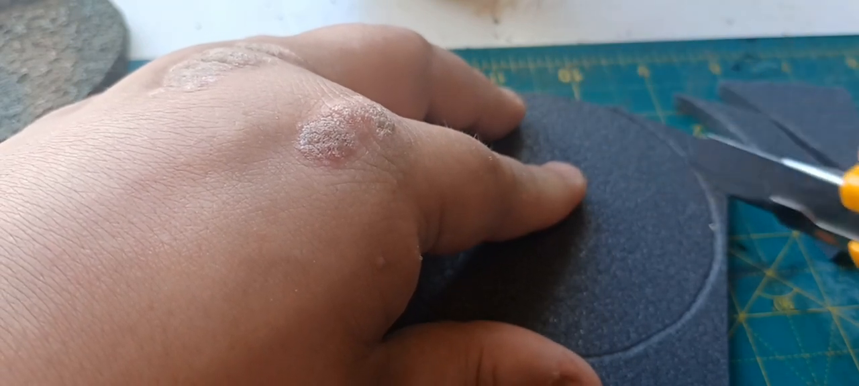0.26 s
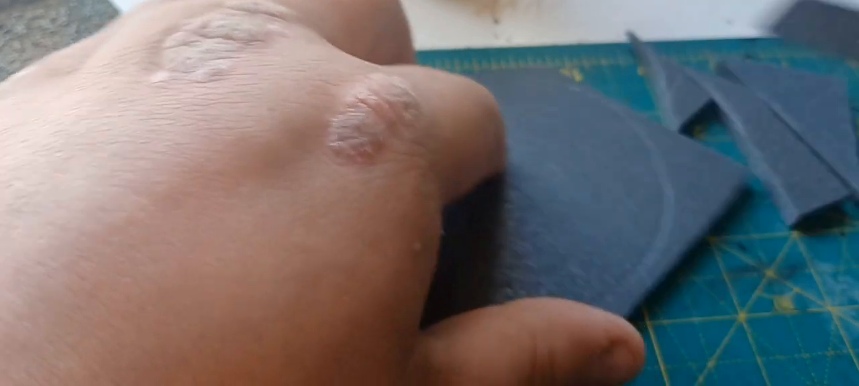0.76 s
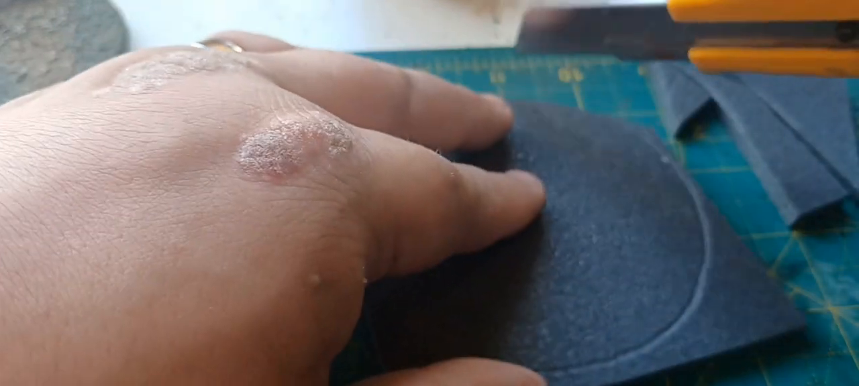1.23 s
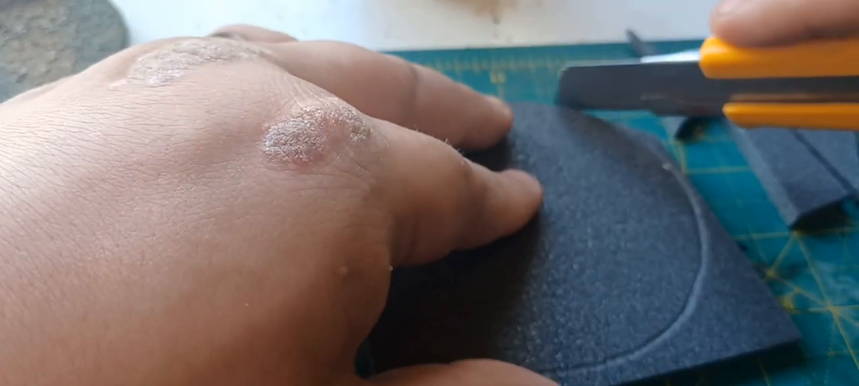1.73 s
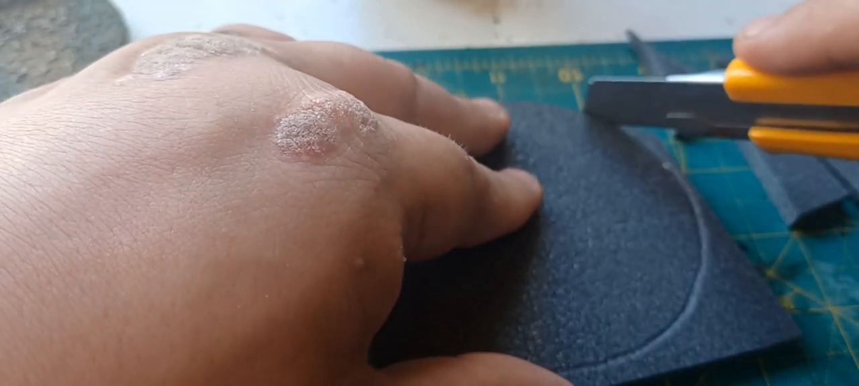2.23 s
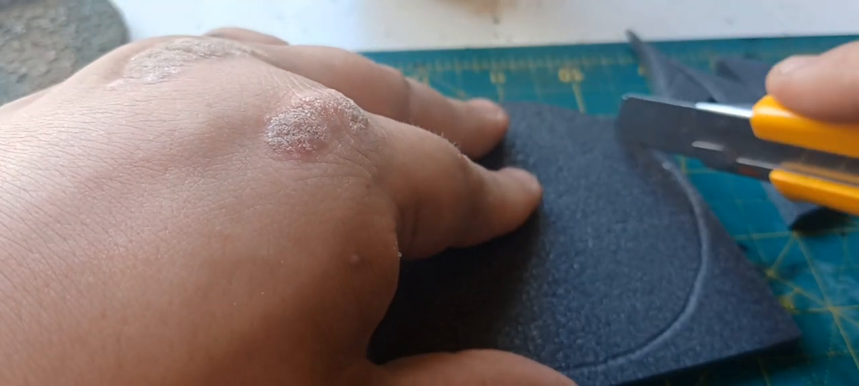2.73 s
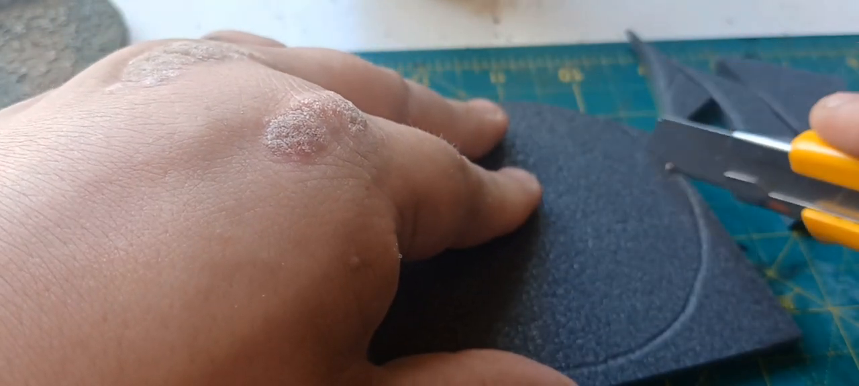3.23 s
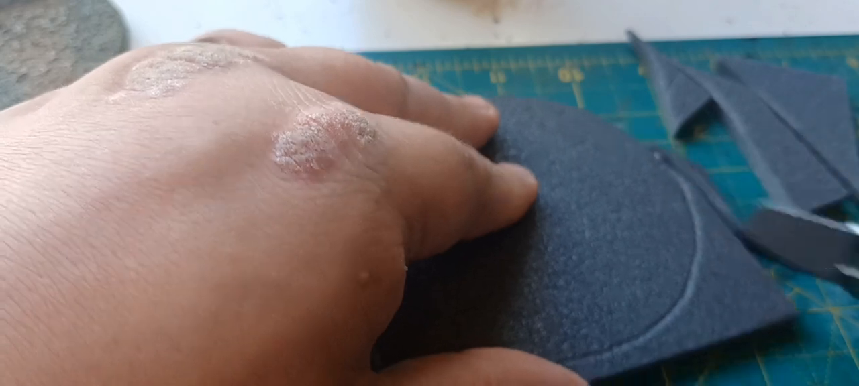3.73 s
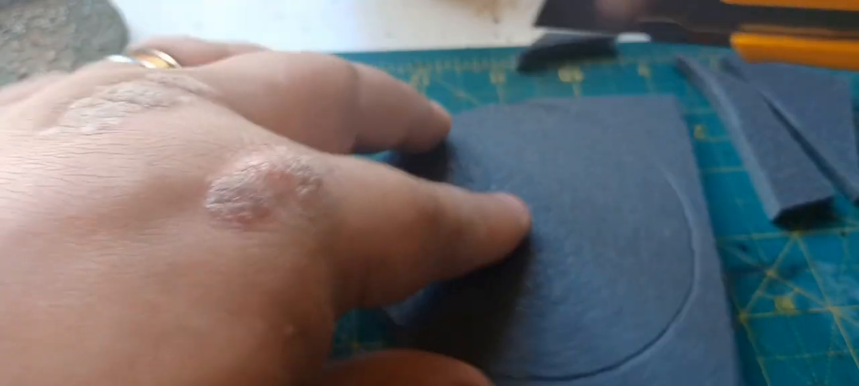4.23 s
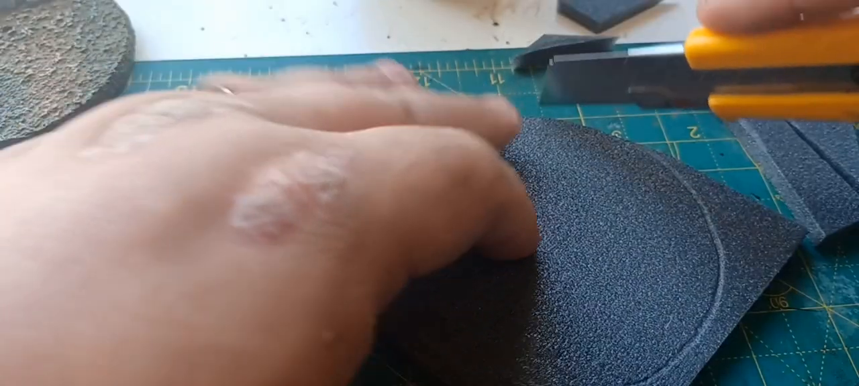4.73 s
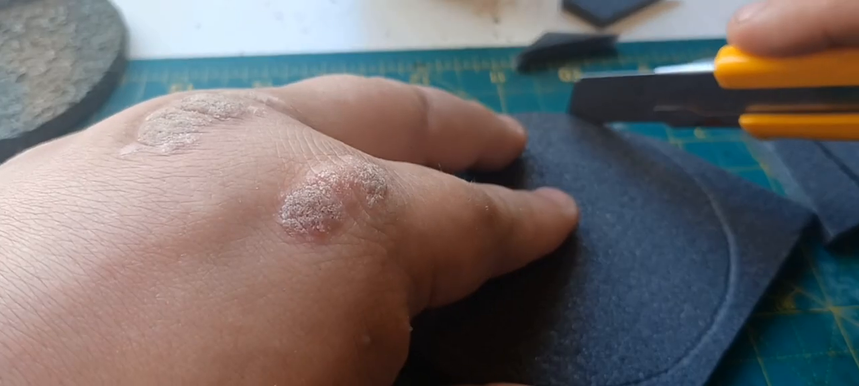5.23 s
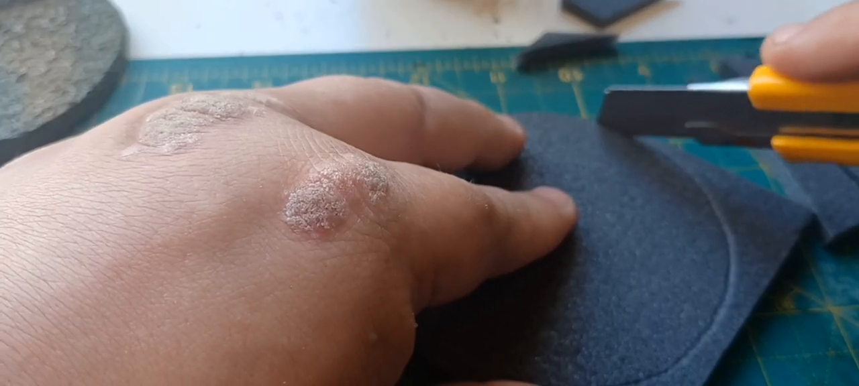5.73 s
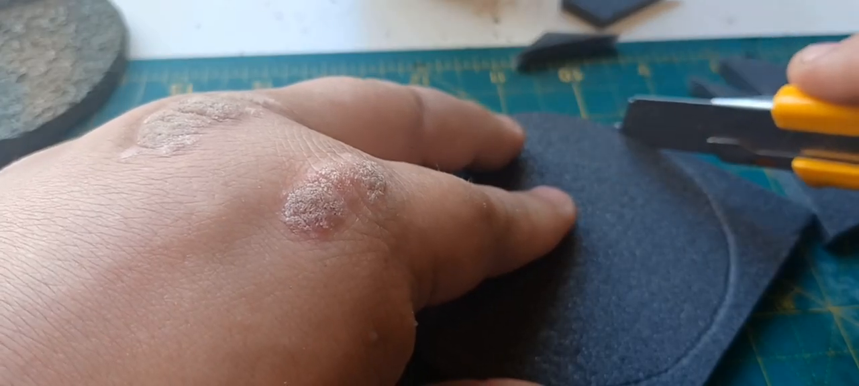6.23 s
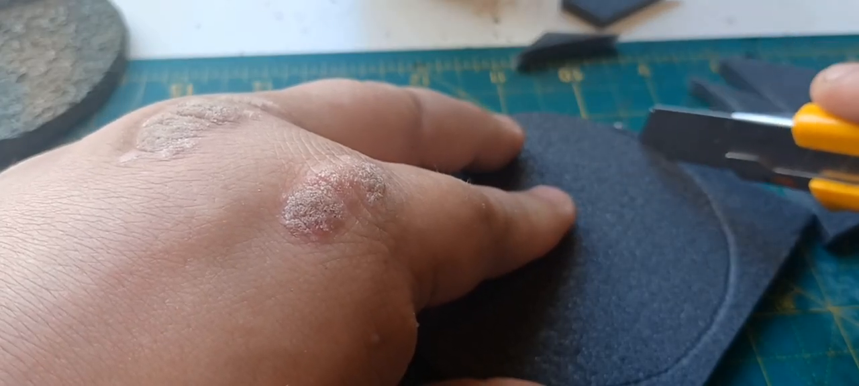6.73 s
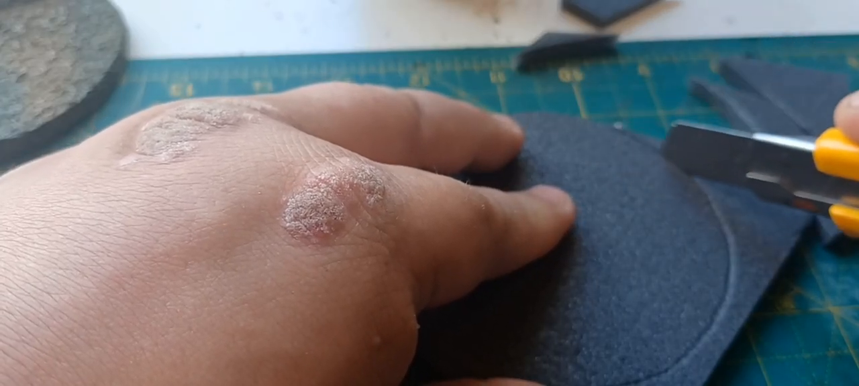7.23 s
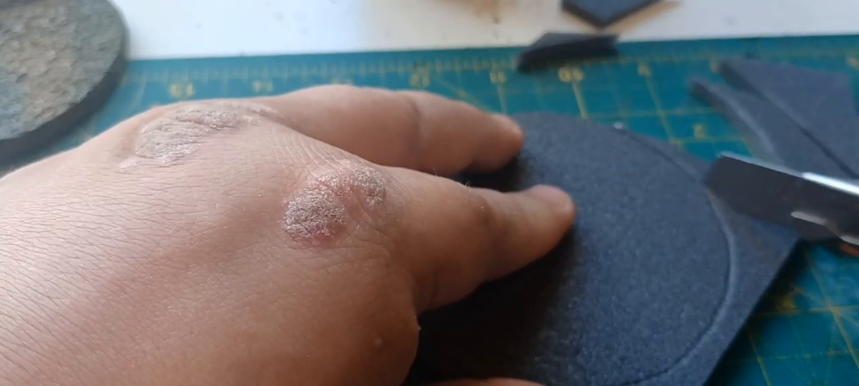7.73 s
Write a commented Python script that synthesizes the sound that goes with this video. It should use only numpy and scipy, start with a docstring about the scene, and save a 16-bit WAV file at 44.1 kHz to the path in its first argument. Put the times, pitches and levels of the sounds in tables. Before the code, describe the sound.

A utility knife cuts foam on a mat, close to a phone microphone in a quiet room. From about 0.3 to 1.3 seconds come bright, stuttering, raspy strokes, with soft hand bumps on the table near 0.5. Distant knocks and heavy thumps sound around 1 and 1.6 seconds. The blade then creeps faintly, with tiny ticks, soft hollow rustles and far knocks near 2.4 and 3.2. The loudest cutting runs from 3.5 to about 4.9 seconds, several quick scratchy strokes with small snaps and a firm, dull table bump at 3.7. A lull follows with faint scraping and scattered ticks. Thumps and knocks from elsewhere in the house return at 6.2 and cluster between 6.7 and 7.1, with two small metallic pings around 7. The scratch swells again from 7.7 to the end. A faint low table hum comes and goes underneath.

```python
"""A dense, bright scratch swells close by: a thin blade is drawn through foam on a cutting mat.
The foam cells tear one by one while stick-slip friction makes the blade rasp and the sheet flex.
The table hums and bumps under the hands; cells and fingers tick, and a hollow rustle comes and goes.
Knocks, heavy thumps and small pings arrive from elsewhere in the house, blurred by the rooms.
A two-port phone microphone picks it all up over the quiet air of the room."""
import sys
import numpy as np
from scipy import signal
from scipy.fft import rfft, irfft, next_fast_len
from scipy.io import wavfile
from scipy.ndimage import uniform_filter1d, map_coordinates

SR = 44100
rng = np.random.default_rng(int(sys.argv[2]) if len(sys.argv) > 2 else 0)


def unload_wav(signal):
    """Save mono or channel-first audio to the path in sys.argv[1] as 16-bit WAV at rate SR, clipped to [-1, 1]."""
    wavfile.write(
        sys.argv[1],
        SR,
        np.round(np.clip(np.atleast_2d(signal).T, -1, 1) * 32767).astype(np.int16),
    )


N = 351477
FFT_SIZE, ENVELOPE_STEP = next_fast_len(N), 16  # samples

# Blade strokes: peak_s, scratch_db, rasp_db, rise_20db_s, fall_20db_s, peak_to_lift_s
STROKES = [(0.565, -40, -41, 0.1, 2.3, 0.15), (0.731, -36, -37, 0.18, 0.2, 0.095),
           (0.932, -43, -48, .005, .06, 0.022), (1.06, -39, -42, .12, 0.16, 0.22),
           (1.235, -47, -48, 0.18, 0.45, 0.3), (2.37, -55, -52, 0.3, .3, .1),
           (3.65, -32, -36, 0.22, 0.16, 0.11), (3.835, -31, -34.5, .1, 1, 0.055),
           (3.89, -35, -39, .08, .06, .1), (4.139, -37, -41, 0.006, 0.5, .09),
           (4.19, -38, -40, 0.05, 0.03, 0.04), (4.258, -30, -34, 0.03, .2, .175),
           (4.31, -37, -40, .05, .07, .1), (4.532, -39, -42, .005, 0.8, 0.035),
           (4.61, -45, -46, .05, 0.06, .06), (4.751, -50, -52, .005, 0.3, 0.09),
           (4.856, -50, -47, .005, .05, .035), (6.467, -59.5, -62.5, 0.17, 0.1, .15),
           (7.025, -62, -55, 0.28, 0.4, 0.11), (7.745, -50, -56.5, 0.07, .5, .2),
           (7.95, -42, -50, 0.3, .5, .2)]
# The blade creeping on slowly: time_s, scratch_db, rasp_db
CREEP = [(0, -54, -55.5), (.35, -35.5, -36.5), (.4, -36.5, -38.5), (.445, -63, -58.5), (.88, -62.5, -49),
         (1.45, -58, -51.5), (1.75, -82, -83), (2.5, -77, -74), (2.65, -56, -56.5), (2.952, -56, -52.5),
         (3.45, -77, -65.5), (4.05, -55, -44.5), (4.46, -64, -64.5), (4.72, -62.5, -58), (5.0, -75, -75),
         (5.13, -72.5, -66), (5.28, -70, -86), (5.75, -68, -66.5), (6.0, -76, -86), (6.64, -74, -79),
         (6.73, -73, -51.5), (6.82, -73, -74), (7.18, -62, -61.5), (7.4, -69, -55), (7.97, -42, -43)]
# Spectrum of the bright foam scratch, with the microphone's notch near 7.7 kHz: frequency_hz, density_db
SCRATCH_SPECTRUM = [(4500, -13), (7000, -2), (7750, -13.5), (8800, -5), (12000, 4), (14000, 1.5),
                    (16000, 1)]
# Blade resonances: pitch_hz, width_hz, stroke_db, creep_db
BLADE_MODES = [(2660, 820, -13, -12), (3586, 630, -1, -3), (4507, 940, -6.5, -2), (5294, 710, -2.5, -3),
               (5850, 400, -7, -4), (6570, 410, -8.5, -10)]
# Spectrum of the flexing sheet: frequency_hz, density_db
SHEET_SPECTRUM = [(300, -6.5), (550, -3), (1050, 1.5), (1400, 2), (2000, -1), (2500, -1), (3200, -11.5)]
# Table top resonances: pitch_hz, width_hz, level_db
TABLE_MODES = [(135.5, 43, -4), (244.7, 51, 3), (311, 66, -2), (417.5, 101, -6), (565, 264, -15.5)]
# Hum of the table under the moving hands: time_s, level_db
TABLE_HUM = [(0.0, -54.5), (0.55, -43.5), (0.93, -55.5), (1.2, -45), (1.6, -59), (1.75, -49), (2.02, -58),
             (3.55, -57.5), (3.7, -51), (4.77, -57), (4.9, -77.5), (6.15, -62), (6.35, -62.5),
             (6.77, -50.5), (7.01, -49.5), (7.26, -56), (7.97, -50)]
# Hollow rustles: peak_s, level_db, rise_20db_s, fall_20db_s, peak_to_stop_s
RUSTLES = [(1.33, -46, 0.45, 0.3, 0.16), (2.37, -54, 0.22, .05, 0.013), (2.736, -57, 0.2, 0.4, 0.32),
           (4.55, -51, 0.3, 0.25, 0.11)]
# Resonance of the rustle: pitch_hz, width_hz, level_db
RUSTLE_MODES = [(1237, 300, 0)]
# Ticks of single cells and fingers: start_s, level_db
TICKS = [(0.9288, -31), (1.2426, -32), (1.504, -37), (2.168, -42), (2.1909, -44), (2.3471, -40),
         (2.587, -45), (2.602, -44), (2.616, -42), (2.6599, -38), (2.8898, -41), (2.9612, -36),
         (3.1857, -32), (3.3258, -43), (4.0078, -39), (4.0198, -34), (4.139, -27), (4.327, -27),
         (4.4268, -36), (4.7501, -42), (4.7785, -33), (4.8549, -32), (4.9152, -38), (4.936, -43),
         (5.1292, -44), (5.3053, -47), (5.4051, -43), (6.0147, -47), (6.0965, -50), (6.1774, -39),
         (6.3704, -50), (6.4622, -45), (6.476, -47), (6.6573, -48), (7.1611, -39), (7.7413, -29)]
# Foam breaking or the knife clicking: start_s, level_db
SNAPS = [(1.504, -41), (4.878, -36), (4.888, -38), (3.683, -33), (3.739, -34), (3.746, -35), (6.956, -37)]
# Soft bumps of the hand on the table: start_s, level_db, pitch_hz
BUMPS = [(0.429, -30.5, 298), (0.499, -23.5, 241), (0.572, -35, 226), (3.681, -18, 267), (3.723, -21, 253),
         (3.733, -12.5, 250.5), (4.268, -28.5, 328), (4.699, -29.5, 104), (4.763, -27, 241)]
# Far knocks on something hard: start_s, level_db, t60_s, wood_ring_db, thin_ring_db
KNOCKS = [(1.042, -38.5, 0.18, -5, -20), (1.589, -39.5, 0.42, 0.5, -16), (1.822, -55, 0.25, 5.5, -29),
          (2.377, -40, 0.27, 2, -7.5), (3.176, -37, 0.26, -2, -10), (3.679, -43, 0.13, -0.5, -3.5),
          (3.736, -43, 0.37, -7.5, -11), (4.854, -44, 0.11, -7.5, -15), (5.062, -44.5, 0.27, -7.5, -4),
          (6.2, -50.5, 0.41, 1.5, -21), (6.718, -46, 0.25, -14, -3), (6.821, -50, 0.45, 4, -29),
          (6.923, -43.5, 1, -9, -22), (7.042, -42.5, 0.23, -3, 1.5), (7.691, -59, 0.2, 2, 8.5)]
# Wooden and thin resonances of a knock: pitch_hz, width_hz, level_db
WOOD_MODES = [(891, 120, 6), (1100, 57, 9), (1335, 18, -1), (1790, 40, 2.5), (2335, 54, -1.5)]
THIN_MODES = [(1687, 20, 3), (2377, 60, -10)]
# Spectra of a knock's broad body and bright edge: frequency_hz, density_db
BODY_SPECTRUM = [(550, -15.5), (800, -5.5), (1180, 2.5), (2200, -7.5), (3100, -12.5), (4000, -39)]
EDGE_SPECTRUM = [(2500, -30), (3300, 1), (5000, 0.5), (6800, -12.5), (7800, -28)]
# Far thumps through the floor: start_s, level_db, t60_s, deep_share_db
THUMPS = [(1.05, -33, 0.25, -11), (1.189, -43, 1, -14.5), (1.33, -47, 0.4, 7), (1.587, -27.5, 0.77, -9.5),
          (2.4, -46.5, 0.38, -10), (6.202, -33.5, 0.48, -2), (6.826, -35.5, 0.39, -10),
          (6.929, -30, 0.39, -38), (7.051, -34.5, 0.5, -26)]
# Booming and deep resonances of the floor: pitch_hz, width_hz, level_db
FLOOR_MODES = [(125.8, 26.3, 5.5), (191.6, 16.5, 4), (252, 65, -4.5), (310, 67, -12), (465, 340, -23)]
DEEP_MODES = [(59.6, 58, -28), (83.9, 14.6, 18)]
# Far metallic pings: start_s, level_db, pitch_hz
PINGS = [(6.9566, -35, 4250), (6.9566, -43, 3550), (7.0795, -43, 5200)]
# Spectrum of the room's air: frequency_hz, density_db
ROOM_SPECTRUM = [(18, -51.5), (30, -24.5), (245, 2), (740, -45), (1200, -24.5), (1960, -35), (2480, -17),
                 (3310, -33.5), (3870, -25.5), (8520, -37), (12600, -35), (16000, -42)]


def cutting():
    """Stick-slip friction: the blade grips and slips, so scratch and rasp stutter together."""
    t = np.arange(N) / SR
    creep_s, creep_scratch_db, creep_rasp_db = np.transpose(CREEP)
    _, scratch_db, rasp_db, *_ = np.transpose(STROKES)
    strokes = np.array([swell(s, 0, rise, fall, lift) for s, _, _, rise, fall, lift in STROKES])
    hard, creep = undb(rasp_db) @ strokes, undb(np.interp(t, creep_s, creep_rasp_db))
    scratch_gain = undb(scratch_db) @ strokes + undb(np.interp(t, creep_s, creep_scratch_db))
    slip_db = .7 * walk(45) + 1.4 * walk(200)
    return foam_scratch(scratch_gain, slip_db) + blade_rasp(hard, creep, slip_db) + sheet(hard, creep)


def foam_scratch(gain, slip_db):
    """Countless tiny fractures merge into noise whose dull and bright bands waver independently."""
    cells = shape(pair(0.04, tearing(scatter_db=3.2)), SCRATCH_SPECTRUM)
    dull = butterworth(cells, 11500, "low")
    scratch = dull * undb(0.58 * walk(5.2)) + (cells - dull) * undb(2 * walk(4.47))
    return scratch * gain * undb(slip_db + np.array([[-.6], [.6]]))


def blade_rasp(hard, creep, slip_db):
    """Tearing excites the blade's resonances; each wavers and slides as the cut moves along the edge."""
    cells = pair(0.25, tearing(scatter_db=2.5))
    rasp = 0
    for hz, width, hard_db, creep_db in BLADE_MODES:
        waver = undb(2 * walk(4) + 1.8 * walk(40) - 34)
        drive = hard * undb(hard_db) + creep * undb(creep_db)
        mode = drift(ring(cells, [(hz, width, 0)]), share=.025, rate_hz=5)
        rasp += waver * drive * np.sqrt(width) * mode
    return rasp * undb(0.8 * slip_db + np.array([[-.7], [.7]]))


def sheet(hard, creep):
    """The flexing sheet radiates mid-range noise, mostly under hard strokes."""
    flex = pair(.5, tearing(scatter_db=2.4)) * undb(1.6 * walk(12))
    return shape(flex, SHEET_SPECTRUM) * undb(-4) * (hard + 0.5 * creep) ** 1.08


def table_hum():
    """Forced vibration: the moving hands drive the low modes of the table top."""
    level_db = np.interp(np.arange(N) / SR, *np.transpose(TABLE_HUM))
    return ring(pair(0.89, hiss), TABLE_MODES) * undb(level_db + 3.26 * walk(20))


def rustle():
    """Noise through one resonance gives a hollow rustle in short swells."""
    envelope = uniform_filter1d(sum(swell(*row) for row in RUSTLES), 900)
    return envelope * undb(2 * walk(25.23)) * ring(pair(0.84, hiss), RUSTLE_MODES)


def ticks(strays_per_s=14, tail_s=.008):
    """Cells and fingers give bright impulses with a short scattered tail; faint ones fall at random."""
    impulses = np.zeros((2, N))
    for (s, db), (pan, sign) in zip(TICKS, rng.standard_normal((len(TICKS), 2))):
        impulses[:, int(s * SR)] = np.sign(sign) * undb(db + 1.5 * pan * np.array([1, -1]))
    impulses += (rng.random(N) < strays_per_s / SR) * undb(-63 + 3 * hiss())
    t = np.arange(2000) / SR
    response = undb(-12) * np.exp(-t / tail_s) * rng.standard_normal((2, len(t)))
    response[:, 0] = 3.6  # the direct impulse
    return butterworth(signal.fftconvolve(impulses, response, axes=1)[:, :N], 4500, "high")


def snaps(decay_s=.003):
    """Breaking foam and knife clicks are transients: mid-range noise with an exponential decay."""
    t = np.arange(N) / SR
    envelope = sum(undb(db) * np.exp(-np.abs(t - s) / decay_s) * (t > s) for s, db in SNAPS)
    return envelope * unit(butterworth(pair(0.13, hiss), (1200, 5200), "band"))


def hand_bumps():
    """A soft impact rocks the table top in one heavily damped mode."""
    return damped_sines(BUMPS, rise_s=0.0096, t60_s=0.07)


def far_knocks(hold_s=0.02, edge_t60_share=0.82):
    """Hard impacts ring narrow modes over a broad body whose bright edge decays first."""
    wood, thin = ring(pair(0.13, hiss), WOOD_MODES), ring(pair(0.28, hiss), THIN_MODES)
    body = shape(pair(0.27, hiss), BODY_SPECTRUM) * undb(-2)
    edge = shape(pair(0.11, hiss), EDGE_SPECTRUM) * undb(-13.5)
    out = 0
    for s, db, t60, wood_db, thin_db in KNOCKS:
        timbre = body + undb(wood_db) * wood + undb(thin_db) * thin
        out += timbre * far_impact(s, db, hold_s, t60, rise_s=0.00056)
        out += edge * far_impact(s, db, hold_s, t60 * edge_t60_share, rise_s=0.0005)
    return out


def far_thumps():
    """Structure-borne sound: heavy blows boom in the low modes of the floor."""
    boom, deep = ring(pair(0.95, hiss), FLOOR_MODES), ring(pair(1, hiss), DEEP_MODES)
    return sum(far_impact(s, db, hold_s=0.027, t60_s=t60, rise_s=0.0038) * (boom + undb(deep_db) * deep)
               for s, db, t60, deep_db in THUMPS)


def far_pings():
    """Small metal parts vibrate freely; interfering echoes roughen the tone at each port."""
    roughness = .5 + np.array([walk(450), walk(450)])
    return damped_sines(PINGS, rise_s=0.00065, t60_s=0.11) * roughness


def room_air(level_db=-63.5):
    """Ambient noise is coherent at long wavelengths, so both ports hear the same bass."""
    same, apart = hiss(), np.array([hiss(), hiss()])
    air = butterworth(same - apart, 500, "low", order=1) + apart
    return undb(level_db) * shape(air, ROOM_SPECTRUM)


def tearing(scatter_db):
    """A maker of heavy-tailed fracture noise: a few cells give way much harder than the rest."""
    return lambda: hiss() * undb(scatter_db * rng.exponential(size=N))


def swell(peak_s, db, rise_s, fall_s, lift_s, stop_s=0.034):
    """Exponential growth and decay, cut short lift_s after the peak; slopes are times per 20 dB."""
    age = np.arange(0, N, ENVELOPE_STEP) / SR - peak_s
    drop = np.maximum(-age / rise_s, age / fall_s) + np.maximum(age - lift_s, 0) / stop_s
    return np.repeat(undb(db - 20 * drop), ENVELOPE_STEP)[:N]


def far_impact(start_s, db, hold_s, t60_s, rise_s):
    """Envelope: a quick rise, a short hold, a tail cut ever faster by the phone's noise suppression."""
    age = np.maximum(np.arange(0, N, ENVELOPE_STEP) / SR - start_s, 0)
    fade = (np.maximum(age - hold_s, 0) / t60_s) ** 1.3
    return np.repeat(undb(db - 60 * fade) * (1 - np.exp(-age / rise_s)), ENVELOPE_STEP)[:N]


def damped_sines(events, rise_s, t60_s):
    """Damped oscillation: each blow sets one mode swinging until it dies away."""
    out, t = np.zeros(N), np.arange(8000) / SR
    attack = 1 - np.exp(-t / rise_s)
    for s, db, hz in events:
        i = int(s * SR)
        out[i:i + len(t)] += undb(db - 60 * t / t60_s) * attack * np.sin(2 * np.pi * hz * t)
    return out


def drift(x, share, rate_hz):
    """Frequency modulation: a wandering read speed slides the pitch by a share of itself."""
    place = np.cumsum(1 + share * walk(rate_hz))
    return np.array([map_coordinates(channel, [place], mode="mirror") for channel in x])


def ring(x, modes):
    """Resonance: filter by steep peaks that add in power, and scale to rms 1."""
    f = np.fft.rfftfreq(FFT_SIZE, 1 / SR)
    power = sum(undb(db) ** 2 / (1 + (2 * (f - hz) / width) ** 2) ** 2 for hz, width, db in modes)
    return unit(irfft(rfft(x, FFT_SIZE) * np.sqrt(power), FFT_SIZE)[..., :N])


def shape(x, spectrum):
    """Spectral envelope: filter by a curve drawn over log frequency, and scale to rms 1."""
    hz, db = np.transpose(spectrum)
    f = np.maximum(np.fft.rfftfreq(FFT_SIZE, 1 / SR), 1)
    gain = undb(np.interp(np.log(f), np.log(hz), db))
    return unit(irfft(rfft(x, FFT_SIZE) * gain, FFT_SIZE)[..., :N])


def butterworth(x, hz, kind, order=2):
    """Filter with a maximally flat passband."""
    return signal.sosfilt(signal.butter(order, hz, kind, fs=SR, output="sos"), x)


def pair(shared_power, make, lag_samples=5):
    """Partial coherence: two ports hear a shared part, the left one late, and a part of their own."""
    shared, own = make(), np.array([make(), make()])
    both = np.array([np.roll(shared, lag_samples), shared])
    return np.sqrt(shared_power) * both + np.sqrt(1 - shared_power) * own


def walk(rate_hz):
    """Random modulation: levels held 1 / rate_hz seconds and smoothed twice; spread near 1."""
    hold = int(SR / rate_hz)
    steps = np.repeat(rng.standard_normal(N // hold + 1), hold)
    return 1.4 * uniform_filter1d(uniform_filter1d(steps, hold), hold)[:N]


def hiss():
    """White noise: equal power per hertz."""
    return rng.standard_normal(N)


def unit(x):
    """Normalise to rms 1."""
    return x / np.sqrt(np.mean(x ** 2))


def undb(db):
    """Decibels to amplitude ratio."""
    return 10 ** (np.asarray(db) / 20)


def scene():
    """Superposition: near and far sources add at the table."""
    near = cutting() + table_hum() + rustle() + ticks() + snaps() + hand_bumps()
    return near + far_knocks() + far_thumps() + far_pings() + room_air()


def record(dry):
    """Band limiting: the phone thins the deepest bass and cuts the top steeply."""
    bass_hz, top_hz = 55, 15750
    thinned = butterworth(dry, bass_hz, "high")
    return signal.sosfilt(signal.ellip(10, .2, 60, top_hz, fs=SR, output="sos"), thinned)


dry = scene()
out = record(dry)
unload_wav(out)
```